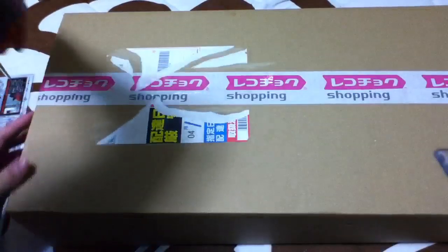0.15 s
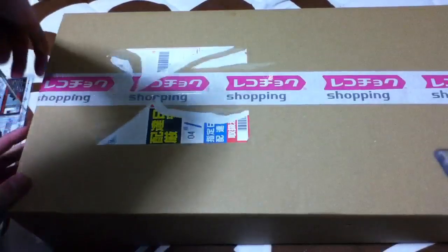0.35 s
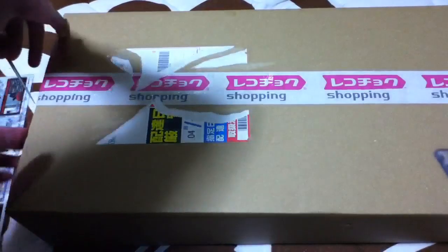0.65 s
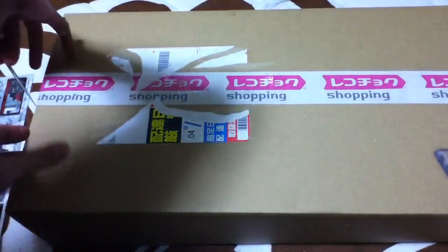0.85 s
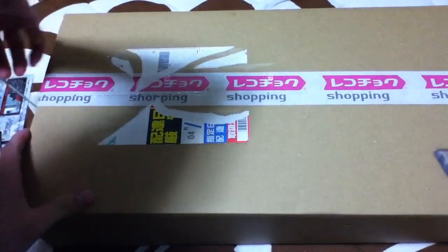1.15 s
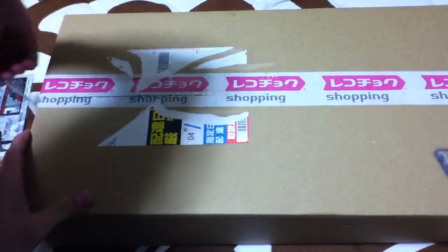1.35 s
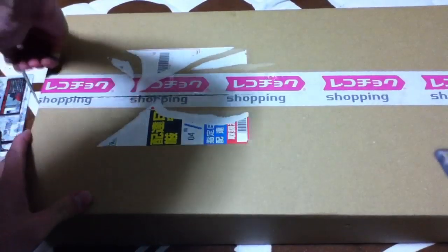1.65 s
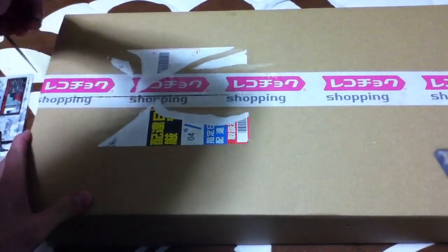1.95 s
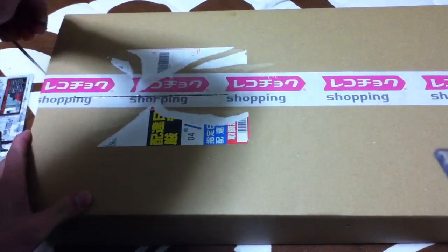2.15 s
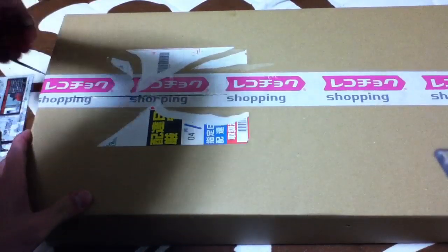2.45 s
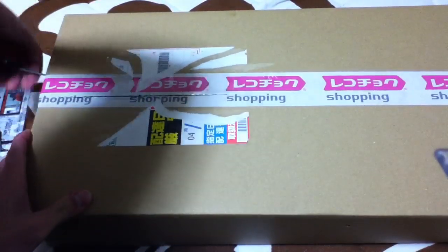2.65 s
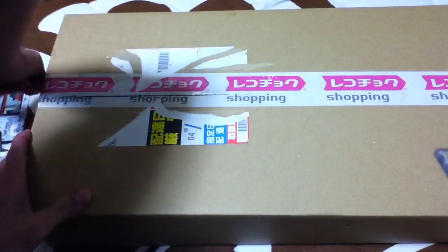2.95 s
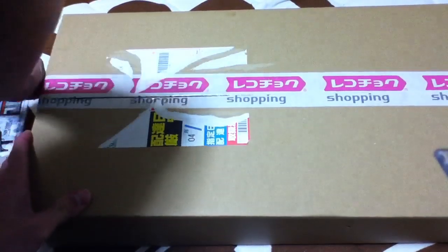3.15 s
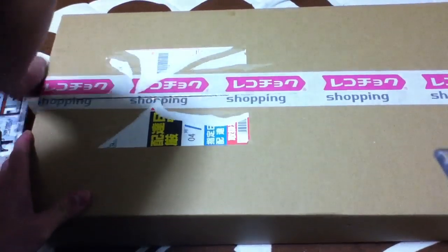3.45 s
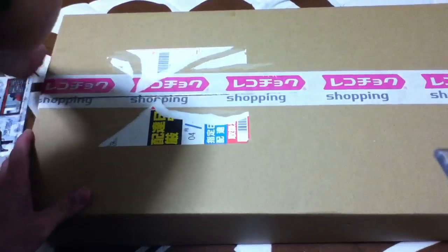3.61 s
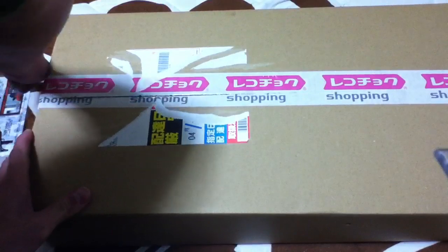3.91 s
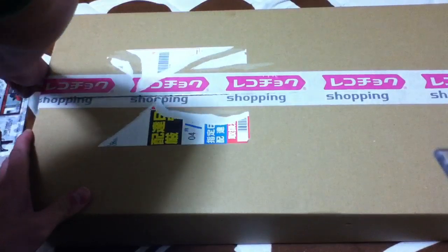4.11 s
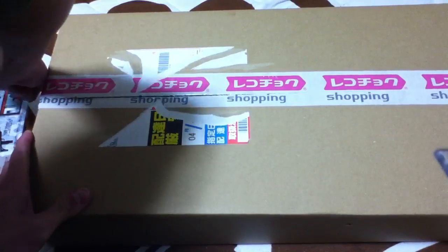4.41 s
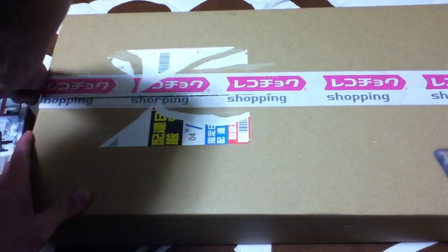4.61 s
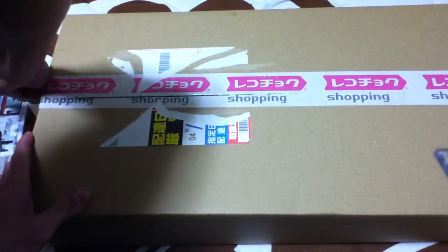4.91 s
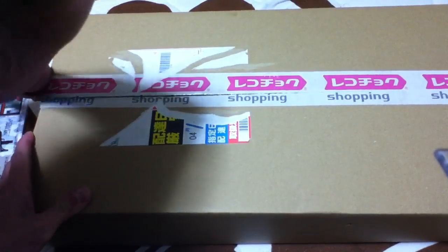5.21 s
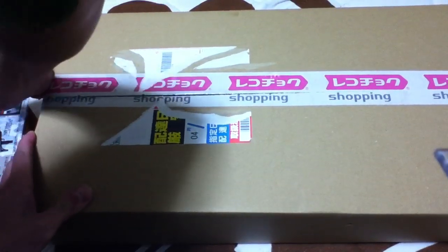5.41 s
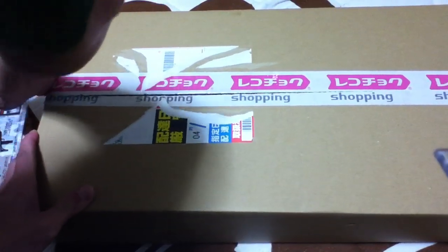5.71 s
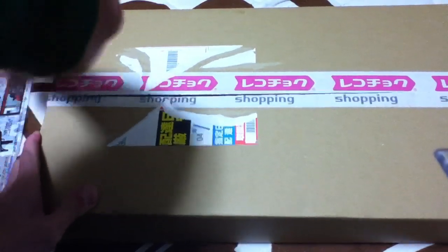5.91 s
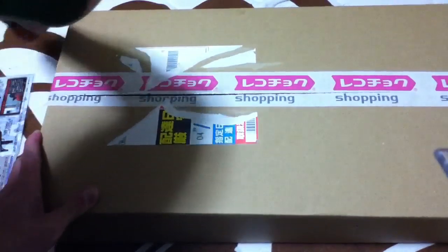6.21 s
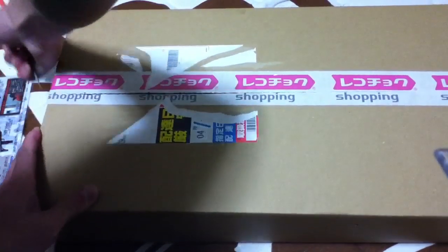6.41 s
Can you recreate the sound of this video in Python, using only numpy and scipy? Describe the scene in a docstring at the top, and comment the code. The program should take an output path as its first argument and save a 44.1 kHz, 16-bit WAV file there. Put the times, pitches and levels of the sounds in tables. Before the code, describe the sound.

Close, crisp tape cracks and light scrapes and taps on a cardboard box in a quiet room, then a brief tear and louder knocks.

```python
"""A quiet small room, one microphone close to a cardboard box as a blade picks at and slits its tape.
The tape snaps in short cracks. Fingers knock the panels into clicking and the air inside into booming.
Skin and blade rub in streams of tiny slips, and near the end the tape rips and lets go.
The walls answer briefly; behind it all lie low room rumble and the microphone's own hiss."""
import sys
import numpy as np
from scipy import signal
from scipy.fft import rfft, irfft
from scipy.io import wavfile
from scipy.ndimage import uniform_filter1d

SR = 44100
rng = np.random.default_rng(int(sys.argv[2]) if len(sys.argv) > 2 else 0)


def int16_out(signal):
    """Quantize to a 16-bit WAV file."""
    q = np.round(np.clip(np.atleast_2d(signal).T, -1, 1) * 32767)
    wavfile.write(sys.argv[1], SR, q.astype(np.int16))


N = 289296

SNAP_T60_S, ECHO_S, ECHO_DB = 0.0033, 0.0026, -6.5
# the dull, main and bright bands of a snap: low_hz, high_hz
SNAP_BANDS = [(2000, 5800), (4400, 8730), (8000, 14500)]
# tape snaps and blade ticks: start_s, dull_peak_db, main_peak_db, bright_peak_db
TAPE_SNAPS = [(0.0343, -33.5, -21, -21), (0.5024, -36, -56, -45), (0.6292, -32, -53, -51),
              (0.6497, -24, -28, -41), (0.9139, -46, -41, -57), (0.965, -48, -39.5, -56),
              (1.1474, -35, -55, -50), (1.362, -39, -43, -49), (1.4264, -54, -39, -54),
              (1.455, -40, -25, -33), (1.4902, -48, -21, -45), (1.583, -52, -21.5, -28),
              (1.787, -47, -34, -21), (1.7965, -20, -8.5, -20), (2.489, -38, -51, -49),
              (2.7852, -52, -49, -36.5), (3.043, -48, -35, -25.5), (3.1048, -37, -46, -30),
              (3.1805, -14.5, -4.5, -5.5), (3.3254, -40, -34, -27.5), (3.566, -19.5, -24, -41),
              (3.6417, -33, -32, -55), (3.6667, -24, -18.5, -48), (3.6881, -24.5, -25, -36),
              (4.5754, -57, -40, -35), (4.6324, -52, -45, -37), (4.8114, -29.5, -39, -36),
              (5.1108, -41, -29.5, -33), (5.3996, -41, -29.5, -32), (5.472, -44, -32, -29.5),
              (5.7927, -50, -44, -40), (5.971, -32, -32, -25), (5.9823, -16.5, -25, -25),
              (6.1478, -20, -12.5, -21), (6.1497, -8.5, -9.5, -13)]
def tape_snaps():
    """Close up, each snap is one sharp crack and a dying crackle, answered by a near surface."""
    out, t = np.zeros(N), np.arange(SR // 40) / SR
    crackles = rng.standard_normal((len(TAPE_SNAPS), len(t)))
    echo_lags = (rng.uniform(.92, 1.08, len(TAPE_SNAPS)) * ECHO_S * SR).astype(int)
    for (start_s, *peaks_db), crackle, lag in zip(TAPE_SNAPS, crackles, echo_lags):
        burst = 0.27 * crackle * from_db(-60 * t / SNAP_T60_S)
        burst[0] = 1   # the crack
        i = round(start_s * SR)
        for k, (peak_db, (low_hz, high_hz)) in enumerate(zip(peaks_db, SNAP_BANDS)):
            part = band(burst, low_hz, high_hz)
            part = band(part, 1.016 * low_hz, 1.2 * high_hz)   # twice, for steep edges
            part = from_db(peak_db) * (-1) ** k * part / np.abs(part).max()
            out[i:i + len(t)] += part
            out[i + lag:i + lag + len(t)] += from_db(ECHO_DB) * part
    return out


# modes of the cardboard panels: pitch_hz, level_db, t60_s
PANEL_MODES = [(377, -17.5, 0.03), (678, -12, 0.022), (770, -10.5, 0.017), (964, -12.5, 0.03),
               (1130, -37, 0.013), (1298, -44, 0.01), (1640, 5.5, 0.016), (2170, -6.5, 0.021),
               (3100, 0, 0.0078)]
# modes of the air inside the box: pitch_hz, level_db, t60_s
HOLLOW_MODES = [(125, -12, 0.11), (141.6, 0, 0.054), (200, -4.5, 0.04), (248, -10.5, 0.062),
                (266, -16, 0.12), (353, -4, 0.01)]
# fingers on the box: start_s, blow_db, boom_db, upper_modes_db
FINGER_KNOCKS = [(0.03, -33, -33.5, -14), (0.18, -43, -38, -28), (0.505, -29, -34, -21),
                 (1.366, -34, -39, -20), (1.583, -43, -53, -2.5), (1.77, -24.5, -37, -29),
                 (1.786, -23, -43, -14.5), (2.158, -40, -46, -17), (2.489, -29, -29.5, -18.5),
                 (3.181, -27.5, -34.5, -25), (3.565, -37, -56, -17), (4.585, -42, -36, -21),
                 (4.807, -33, -28, -12), (5.398, -35.5, -35, -12.5), (5.471, -31, -40, -7.5),
                 (5.587, -33.5, -35, -15), (5.634, -41, -32.5, -11), (5.704, -47, -32.5, -20),
                 (5.792, -29, -33.5, -20), (5.982, -7, -9.5, -11.5), (6.007, -14.5, -31, -8),
                 (6.148, -3.5, -29, -8)]
def finger_knocks():
    """The board panels click, the air inside the box booms."""
    start_s, blow_db, boom_db, upper_db = np.transpose(FINGER_KNOCKS)
    panel = struck(PANEL_MODES, start_s, blow_db, upper_db, contact_s=0.00273)
    boom = struck(HOLLOW_MODES, start_s, boom_db, upper_db=0, contact_s=0.0045)
    return band(panel, 260, 6200) + band(boom, 83, 430)   # soft contacts carry no treble


def struck(modes, start_s, level_db, upper_db, contact_s, spread_db=0.5, upper_hz=1300):
    """Every blow is a chatter of three contacts and strikes each mode with a strength of its own."""
    out, starts = np.zeros(N), np.round(start_s * SR).astype(int)
    scatter_db = spread_db * rng.standard_normal((len(starts), len(modes)))
    lags = (rng.random((len(starts), 3)) * contact_s * SR).astype(int)
    for k, (hz, mode_db, t60_s) in enumerate(modes):
        strength_db = level_db + mode_db + upper_db * (hz > upper_hz) - scatter_db[:, k]
        clicks = np.zeros(N)
        clicks[starts + lags[:, k % 3]] = from_db(strength_db) * (-1) ** k
        out += ring(clicks, hz, t60_s)
    return out


# the tape rips open: time_s, deep_scrape_db, shallow_scrape_db, rustle_db, rumble_db
TAPE_RIP = [(5.945, -44, -55, -52, -49), (5.965, -48, -43, -45, -34), (5.983, -28, -23, -27.5, -18),
            (6.033, -27, -39, -36, -24.5), (6.047, -38, -33, -32.5, -30), (6.069, -30.5, -34, -32, -42),
            (6.1, -42, -33, -36.5, -48), (6.145, -43, -48, -68, -44)]
# rubbing strokes: full_at_s, rise_s, hold_s, fall_s,
# deep_scrape_db, shallow_scrape_db, rustle_db, rumble_db
RUB_STROKES = [(0.184, .01, 0.026, .03, -66, -65, -68, -50),
               (0.242, 0.17, 0.047, 0.14, -65, -61.5, -54, -63),
               (0.504, 0.0087, .02, 0.027, -51, -53, -53.5, -43),
               (0.59, .05, 0.022, .02, -51, -53, -56, -68),
               (0.633, 0.009, 0.0036, 0.013, -45.5, -47, -56, -64),
               (0.651, 0.013, 0.024, 0.058, -46.5, -49, -41.5, -59),
               (0.759, 0.037, 0.026, 0.028, -54, -72, -55, -72),
               (1.003, 0.018, 0.018, .04, -56, -70, -66, -52),
               (1.127, 0.055, 0.026, 0.25, -60.5, -59, -55, -54.5),
               (1.738, 0.0096, 0.06, 0.039, -50.5, -48.5, -48.5, -51),
               (2.161, 0.0091, 0.0049, 0.043, -52, -55, -60, -43),
               (2.549, 0.043, 0.03, 0.036, -52.5, -48.5, -57.5, -54),
               (2.663, 0.082, .06, 0.036, -56, -53.5, -61.5, -58),
               (2.84, 0.051, 0.058, .06, -59, -77, -82, -59.5),
               (3.029, 0.091, 0.047, .04, -58.5, -55.5, -60.5, -51),
               (3.165, 0.048, 0.029, 0.08, -49.5, -55, -77, -39.5),
               (3.288, 0.075, 0.023, 0.017, -51.5, -53.5, -55.5, -63),
               (3.557, 0.049, .02, 0.064, -52, -47.5, -51.5, -50),
               (3.624, 0.014, 0.063, 0.042, -42, -44, -49, -50.5),
               (4.593, 0.3, 0.046, 0.044, -62, -72, -60, -60),
               (4.807, 0.024, 0.021, 0.055, -48, -51, -51.5, -44.5),
               (5.483, 0.023, 0.047, 0.18, -66, -54, -54, -55),
               (5.797, 0.037, 0.043, 0.096, -62, -55, -55.5, -54),
               (5.901, 0.033, .03, .03, -54.5, -57, -54.5, -46),
               (6.158, 0.011, 0.024, 0.072, -41, -41, -47, -46)]
def rubbing_and_rip():
    """Skin and blade drag over board and tape: the board scrapes, the film crackles, the hollow rumbles."""
    stroke_gains = sum(from_db(row[4:])[:, None] * stroke_swell(*row[:4]) for row in RUB_STROKES)
    gains = gains_in_time(TAPE_RIP) + stroke_gains
    deep, shallow, rustle, rumble = uniform_filter1d(gains, size=SR // 400)
    board = deep * board_scrape(480, 1150, t60_cycles=12, wander_db=2.5)
    board += shallow * board_scrape(1400, 2200, t60_cycles=24, wander_db=3.5)
    hollow = rumble * hollow_rumble()
    return band(board, 265, 2170) + rustle * film_crackle() + hollow


def stroke_swell(full_at_s, rise_s, hold_s, fall_s, edge_db=21):
    """A stroke climbs, holds and sinks, straight in dB: edge_db over each rise or fall time."""
    t = np.arange(N) / SR - full_at_s
    below_full = np.maximum(-t / rise_s, (t - hold_s) / fall_s)
    return from_db(-edge_db * np.clip(below_full, 0, 10))


def board_scrape(low_hz, high_hz, t60_cycles, wander_db):
    """Slips ring small patches of board; which patches sound changes as the hand moves."""
    slips, out = tiny_slips(per_s=2500, spread_db=4), np.zeros(N)
    for hz in np.geomspace(low_hz, high_hz, num=7):
        patch = rms_one(ring(slips, hz, t60_cycles / hz))
        out += from_db(wander_db * drift(rate_hz=25)) * patch
    return rms_one(out)


def hollow_rumble():
    """A stream of slips keeps the air in the box sounding."""
    slips, out = tiny_slips(per_s=400, spread_db=3), np.zeros(N)
    for k, (hz, level_db, t60_s) in enumerate(HOLLOW_MODES):
        out += from_db(level_db) * ring(slips, hz, t60_s) * (-1) ** k
    return rms_one(out)


# tone of the tape film at close range: frequency_hz, gain_db
FILM_SPECTRUM = [(1470, -44), (2500, -7), (3760, -5), (5460, -4), (7150, -7), (9820, -6), (11500, -11.5),
                 (16000, -15.5), (17500, -2)]
def film_crackle(patchy_db=1.5):
    """Grains of adhesive let go; each third of an octave swells as other patches of film sound."""
    slips, patches = tiny_slips(per_s=5000, spread_db=3), np.zeros(N)
    edges_hz = 2000 * 2 ** np.arange(0, 3.2, 1 / 3)
    for k, (low_hz, high_hz) in enumerate(zip(edges_hz, edges_hz[1:])):
        swell = from_db(patchy_db * drift(rate_hz=30))
        patches += swell * band(slips, low_hz, high_hz) * (-1) ** k
    return coloured(patches, FILM_SPECTRUM)


def tiny_slips(per_s, spread_db):
    """Friction lets go at random moments, in clicks of uneven size."""
    sizes = from_db(spread_db * np.minimum(rng.exponential(1, N), 4))
    signs = rng.choice([-1, 1], N)
    return rms_one(sizes * signs * (rng.random(N) < per_s / SR))


def faint_whistle(start_s=4.62, end_s=5.35, fade_s=0.12, level_db=-65, waver_db=2):
    """Noise in one narrow resonance, wavering in level."""
    gate = np.interp(np.arange(N) / SR, [start_s - fade_s, start_s, end_s, end_s + fade_s], [0, 1, 1, 0])
    gain = from_db(level_db + waver_db * drift(rate_hz=12))
    return gate * gain * rms_one(ring(rng.standard_normal(N), hz=1790, t60_s=0.017))


# decay of the small room: frequency_hz, t60_s
ROOM_DECAY = [(200, 0.21), (700, 0.27), (2500, 0.24), (9000, 0.17)]
def room_reflections(x):
    """Dense reflections off the near walls die away band by band."""
    t, edges_hz = np.arange(SR // 2) / SR, 100 * 2 ** np.arange(0, 7.6, .5)
    tail = np.zeros(len(t))
    for low_hz, high_hz in zip(edges_hz, edges_hz[1:]):
        noise = band(rng.standard_normal(len(t)), low_hz, high_hz)
        fade = from_db(-60 * t / at_hz(ROOM_DECAY, np.sqrt(low_hz * high_hz)))
        tail += noise * fade / np.sqrt(np.sum(fade ** 2))
    tail *= 1 - np.exp(-t / 0.0011)   # the walls answer after a few milliseconds
    return signal.fftconvolve(x, tail)[:N]


# room rumble and microphone hiss: frequency_hz, gain_db
ROOM_TONE_SPECTRUM = [(15, -39), (25, -3.5), (80, 5.5), (154, 1), (268, 0.5), (383, -7.5), (743, -14),
                      (853, -13), (2710, -21.5), (10500, -24.5), (16800, -27.5), (18200, -37)]
# slow swells of the room tone: time_s, middle_db, bass_db
ROOM_TONE_SWELLS = [(0.0, -60, -58), (0.75, -60.5, -59), (2.1, -62, -57.5), (2.39, -61.5, -50),
                    (2.76, -58.5, -53.5), (3.1, -62, -51.5), (4.15, -64, -53), (5.0, -61.5, -55),
                    (5.35, -60, -55), (5.86, -58, -53.5), (6.3, -61, -52.5), (6.56, -57, -47)]
def room_tone(floor_db=-59, treble_db=-59.5, high_mid_vs_middle_db=-4.5):
    """Steady room noise and microphone hiss; the middle and the bass swell slowly on top."""
    middle, bass = gains_in_time(ROOM_TONE_SWELLS)
    high_mid, treble = from_db(high_mid_vs_middle_db) * middle, from_db(treble_db)
    layers = [(middle, 400, 1200), (high_mid, 1200, 3000), (treble, 2600, 16000), (bass, 90, 380)]
    out = np.zeros(N)
    for gain, low_hz, high_hz in layers:
        noise = coloured(rng.standard_normal(N), ROOM_TONE_SPECTRUM)
        out += gain * rms_one(band(noise, low_hz, high_hz))
    return out + from_db(floor_db) * coloured(rng.standard_normal(N), ROOM_TONE_SPECTRUM)


def from_db(db):
    return 10 ** (np.asarray(db) / 20)


def rms_one(x):
    return x / np.sqrt(np.mean(x ** 2) + 1e-20)


def band(x, low_hz, high_hz):
    return signal.sosfilt(signal.butter(2, [low_hz, high_hz], "band", fs=SR, output="sos"), x)


def ring(drive, hz, t60_s):
    """One mode: a unit click sets a dying sine of height 1 ringing."""
    decay, step = from_db(-60 / (t60_s * SR)), 2 * np.pi * hz / SR
    return signal.lfilter([0, np.sin(step)], [1, -2 * decay * np.cos(step), decay ** 2], drive + 1e-18)


def drift(rate_hz):
    """A slow wander between random values of spread 1."""
    knots = rng.standard_normal(int(N / SR * rate_hz) + 2)
    return np.interp(np.arange(N) / SR * rate_hz, np.arange(len(knots)), knots)


def at_hz(table, hz):
    """Read a table on a log-frequency axis."""
    table_hz, values = np.transpose(table)
    return np.interp(np.log(hz), np.log(table_hz), values)


def coloured(x, spectrum):
    """Shape a signal by a table of gains over frequency; rms 1."""
    hz = np.maximum(np.fft.rfftfreq(len(x), 1 / SR), 1)
    return rms_one(irfft(rfft(x) * from_db(at_hz(spectrum, hz)), len(x)))


def gains_in_time(rows):
    """Each dB column as a gain, silent outside the rows."""
    time_s, *columns_db = np.transpose(rows)
    return from_db([np.interp(np.arange(N) / SR, time_s, db, left=-200, right=-200) for db in columns_db])


SNAP_ROOM_DB, BOX_ROOM_DB, MIC_LOW_HZ = -9, -7.5, 120
def scene():
    """The box up close, the walls behind it, over room tone; the microphone thins the box's deep bass."""
    snaps = tape_snaps()
    box = finger_knocks() + rubbing_and_rip() + faint_whistle()
    walls = room_reflections(from_db(SNAP_ROOM_DB) * snaps + from_db(BOX_ROOM_DB) * box)
    low_cut = signal.butter(2, MIC_LOW_HZ, "high", fs=SR, output="sos")
    at_mic = signal.sosfilt(low_cut, snaps + box + walls)
    return (at_mic + room_tone())[None]


def record(dry):
    """Peaks are rounded near full scale, the top is cut."""
    rounded = 1.3 * np.tanh(dry / 1.3)
    high_cut = signal.cheby2(12, 70, 18700, fs=SR, output="sos")   # 70 dB down from 18.7 kHz
    return signal.sosfilt(high_cut, rounded)


dry = scene()
out = record(dry)
int16_out(out)
```